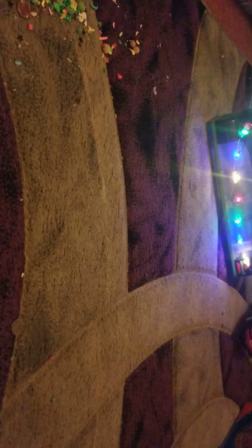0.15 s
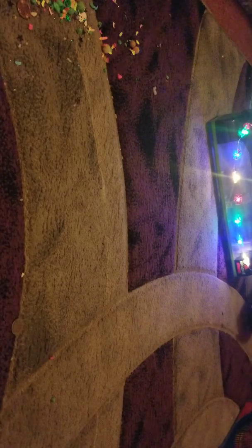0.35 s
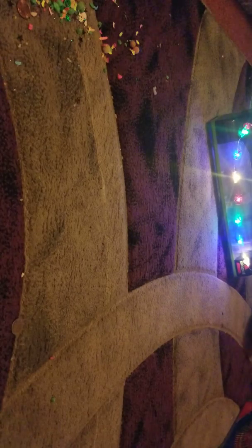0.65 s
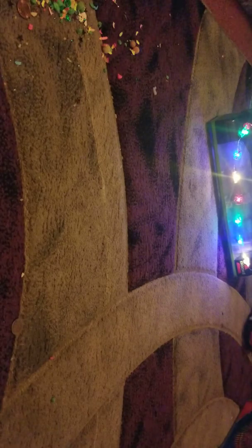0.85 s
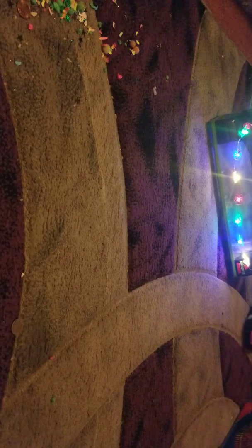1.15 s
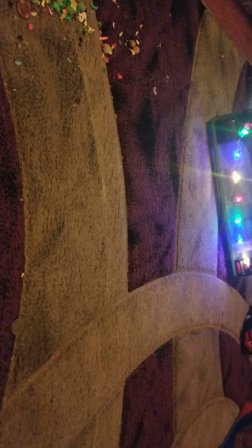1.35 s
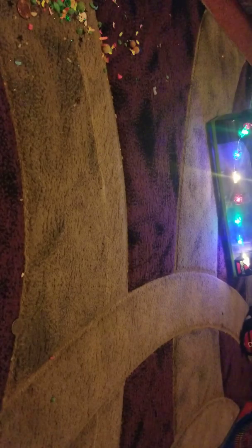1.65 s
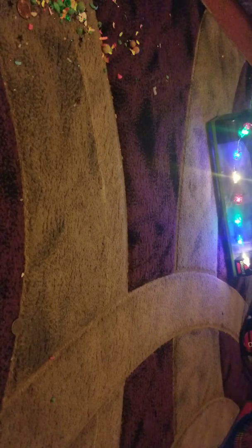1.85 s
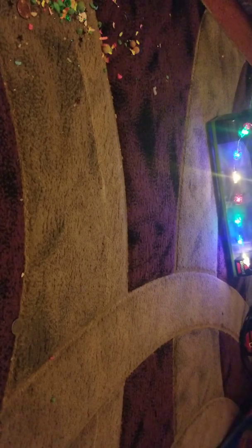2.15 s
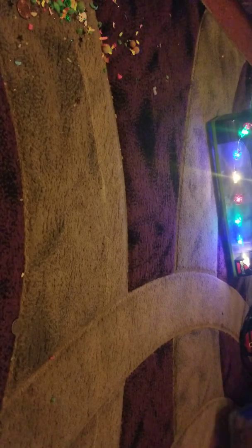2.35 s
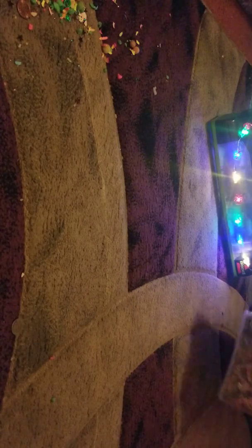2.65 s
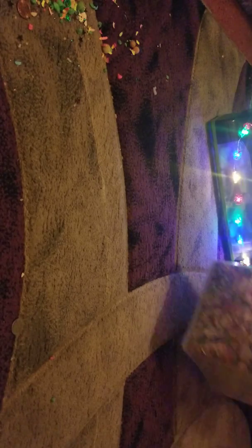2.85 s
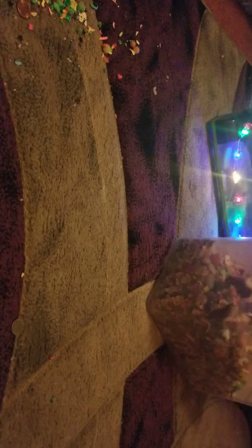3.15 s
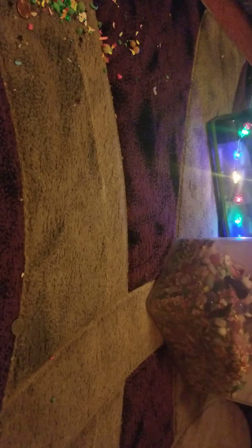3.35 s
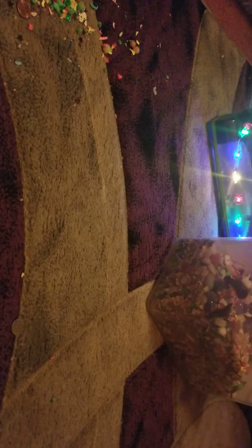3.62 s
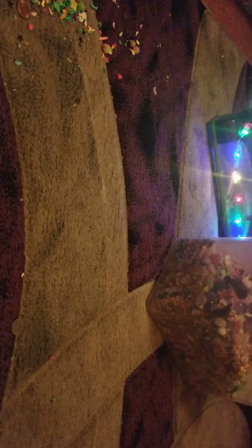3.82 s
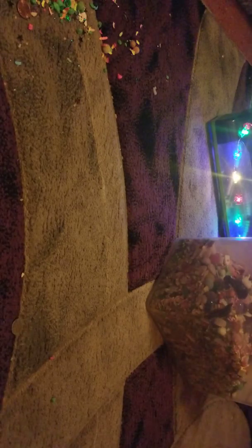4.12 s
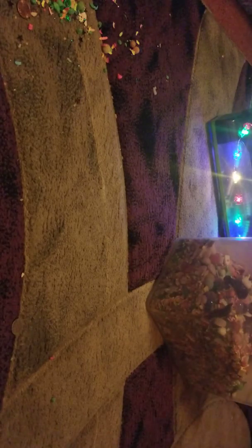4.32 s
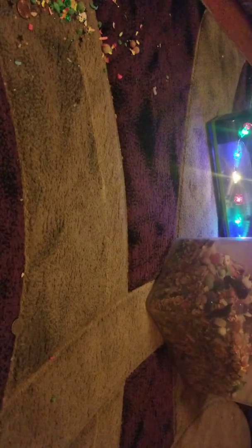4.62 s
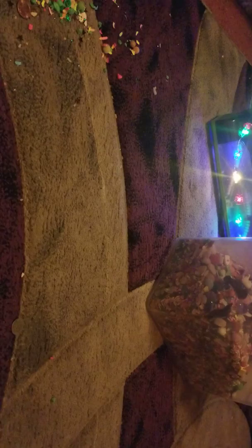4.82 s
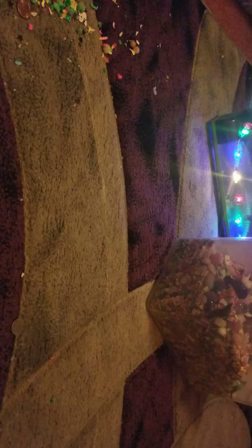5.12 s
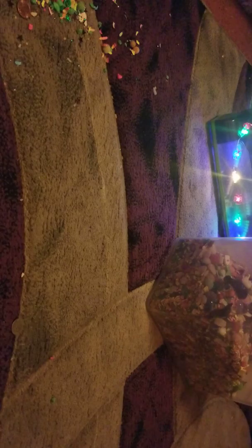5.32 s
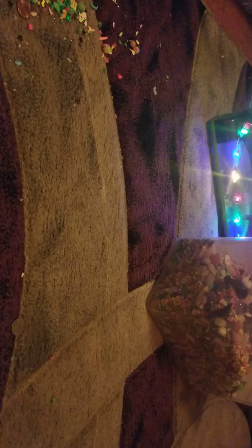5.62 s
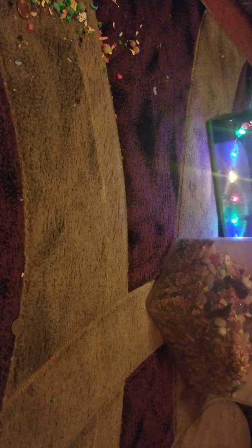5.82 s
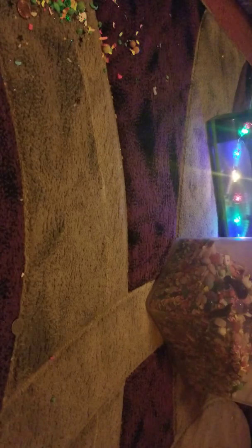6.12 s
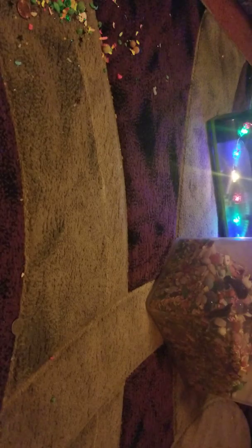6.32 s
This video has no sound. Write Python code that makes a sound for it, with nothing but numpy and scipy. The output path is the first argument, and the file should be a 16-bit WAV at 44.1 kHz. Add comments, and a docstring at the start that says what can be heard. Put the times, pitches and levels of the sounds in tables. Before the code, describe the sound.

Close up in a small carpeted room, a small vacuum cleaner has just been switched off. Its airy roar, whistle and thin motor whine glide steadily downward and fade over about three seconds. Soft bumps and small plastic clicks follow over low room rumble. A sharp click with a debris ping comes late, then a sudden cluster of loud, hard snaps and crackling crumbs at the very end.

```python
"""In a carpeted room, a small vacuum cleaner, just switched off, coasts to a stop.
Air rush (noise-driven duct modes), fan whistle and commutator whine (rotor orders) sink with rotor speed.
Its plastic dust cup is handled: filtered noise bursts bump, click and at last snap.
Hard debris pings as damped sines, crumbs crackle as random grains, and shaped noise rumbles throughout."""
import sys
import numpy as np
from scipy import signal
from scipy.fft import rfft, irfft, next_fast_len
from scipy.io import wavfile
from scipy.ndimage import map_coordinates

SR = 44100
rng = np.random.default_rng(int(sys.argv[2]) if len(sys.argv) > 2 else 0)


def generate_wav(signal):
    """Clip the signal to [-1, 1] and save it as 16-bit WAV at the path in sys.argv[1]."""
    frames = np.transpose(np.atleast_2d(signal))
    scaled = np.clip(frames, -1, 1) * 32767
    pcm = np.round(scaled).astype(np.int16)
    wavfile.write(sys.argv[1], SR, pcm)


N = 285327
TIME = np.arange(N) / SR


def from_db(db):
    """Logarithmic level: decibels to amplitude gain."""
    return 10 ** (np.asarray(db) / 20)


def rms_one(x):
    """Power normalization: scale to rms 1."""
    return x / np.sqrt(np.mean(x ** 2) + 1e-20)


def at_hz(points, hz):
    """Spectral interpolation: read levels on a log-frequency axis."""
    f, db = np.transpose(points)
    return np.interp(np.log(np.maximum(hz, 1)), np.log(f), db)


def drift(rate):
    """Random modulation: smooth chance of rms 1, from rate knots per second."""
    knots = rng.standard_normal(4000)
    # computed at every 20th sample and held
    smooth = map_coordinates(knots, [TIME[::20] * rate], order=2, mode="wrap")
    return rms_one(smooth)[np.arange(N) // 20]


def noise(colour):
    """Spectral shaping: random noise of a given spectrum, rms 1."""
    size = next_fast_len(N)
    hz = np.arange(size // 2 + 1) * SR / size
    spectrum = rfft(rng.standard_normal(size)) * from_db(at_hz(colour, hz))
    return rms_one(irfft(spectrum, size)[:N])


def resonate(x, hz, width):
    """Damped resonance: a two-pole filter with gain 1 at its peak."""
    r = np.exp(-np.pi * width / SR)
    zeros = np.array([1, 0, -1]) * (1 - r * r) / 2
    poles = [1, -2 * r * np.cos(2 * np.pi * hz / SR), r * r]
    return signal.lfilter(zeros, poles, x + 1e-18)


def band(x, low, high):
    """Band limitation: causal band-pass between two frequencies."""
    return signal.sosfilt(signal.butter(2, [low, high], "band", fs=SR, output="sos"), x)


def rise(start_s, rise_s):
    """Linear onset: a ramp from silence to full strength."""
    return np.clip((TIME - start_s) / rise_s, 0, 1)


def add(out, s, sound):
    """Superposition: mix a sound in at its time."""
    start = round(s * SR)
    out[start:start + len(sound)] += sound[:N - start]


ROOM_T60_S = .24


def room(x, wet_db, dull_hz, gap_s):
    """Reverberation: diffuse reflections build up after a short gap and decay exponentially."""
    t = TIME[:SR // 2]
    decay = from_db(-60 * t / ROOM_T60_S)
    build_up = np.clip(t / gap_s - .5, 0, 1)
    tail = rng.standard_normal(len(t)) * decay * build_up
    dulling = signal.butter(1, min(dull_hz, SR / 2 - 1), fs=SR, output="sos")
    tail = signal.sosfilt(dulling, tail / np.linalg.norm(tail))
    return x + from_db(wet_db) * signal.fftconvolve(x, tail)[:N]


# rotor coasting down: (time [s], speed [turns/s])
ROTOR_COAST = [(0, 273.4), (.4, 223.9), (.8, 181.8), (1.2, 145.9), (1.6, 114.9), (2.0, 87.8), (2.4, 63.4),
               (2.8, 40.9), (3.2, 19.3)]


def rotor_speed():
    """Dissipation: air drag and bearing friction slow the rotor smoothly, here along a quartic."""
    s, turns = np.transpose(ROTOR_COAST)
    curve = np.polyval(np.polyfit(s, turns, 4), TIME)
    return np.minimum.accumulate(np.maximum(curve, 0))


# duct resonances: (frequency [Hz], width [Hz], relative level [dB])
DUCT_MODES = [(665.5, 51.5, 3), (540.7, 78, -4), (450.8, 36, -12), (721, 62, -6), (334, 26, -23),
              (235, 63, -31), (984, 96, -13)]
# turbulence colour: (frequency [Hz], relative density [dB per Hz])
TURBULENCE_COLOUR = [(100, -13.5), (250, 20), (450, -1), (900, 9), (1200, -1.5), (1800, 1.5), (2600, -1),
                     (3500, -8), (5000, -17), (6500, -23.5), (8000, -31), (11000, -39.5), (16000, -42.5)]
# sound of air through the fan follows a power of rotor speed: level [dB], exponent
ROAR_DB, ROAR_POWER = -19, 2.527  # level before saturation
HISS_DB, HISS_POWER = -38.5, 2.55  # level at full speed in 1.1 to 5 kHz
ROAR_KNEE = 0.88  # share of full speed above which the roar levels off


def air(speed, low_shift_db=30.5, stop_turns=19.0, flutter_db=0.72):
    """Flow excitation: turbulence rings duct modes; the lower ones take over as the fan slows."""
    flow = speed / speed[0]
    roar, power = 0, 0
    for hz, width, db in DUCT_MODES:
        octaves = np.log2(hz / DUCT_MODES[0][0])
        gain = from_db(db - low_shift_db * (1 - flow) * octaves)
        mode = resonate(rng.standard_normal(N), hz, width)
        roar = roar + gain * rms_one(band(mode, 280, 840))
        power = power + gain * gain
    roar = roar / np.sqrt(power)
    roar_level = from_db(ROAR_DB + flutter_db * drift(20)) * np.tanh((flow / ROAR_KNEE) ** ROAR_POWER)

    hiss = noise(TURBULENCE_COLOUR)
    hiss = hiss / np.std(band(hiss, 1100, 5000))
    # the bearings rub once a turn
    rub = 1 + 0.3 * np.sin(2 * np.pi * np.cumsum(speed) / SR)
    hiss_level = from_db(HISS_DB) * flow ** HISS_POWER

    running = np.minimum(speed / stop_turns, 1) ** 2
    return running * (roar_level * roar + hiss_level * hiss * rub)


# narrow ring of the brush holders: (frequency [Hz], relative level [dB])
BRUSH_HOLDERS = [(3000, -110), (4000, -86), (4400, -73), (5000, -73), (5800, -70), (6200, -85),
                 (7500, -115)]
COMMUTATOR_BARS = 24
# level before bar modulation [dB], speed below which it fades [turns/s]
SCRATCH_DB, SCRATCH_FADE_TURNS = -75, 138


def brush_scratch(speed):
    """Friction excitation: brushes catch on each commutator bar and hiss through their holders."""
    catch = 1 + .7 * np.sin(COMMUTATOR_BARS * 2 * np.pi * np.cumsum(speed) / SR)
    fade = np.minimum(speed / SCRATCH_FADE_TURNS, 1)
    return from_db(SCRATCH_DB) * fade * noise(BRUSH_HOLDERS) * catch


BLADES = 9
# fan whistle through the housing: (frequency [Hz], relative level [dB])
HOUSING_WHISTLE = [(300, -76), (600, -53.5), (1000, -65.5), (1300, -65), (1480, -49), (1750, -39),
                   (1810, -39), (1860, -32.5), (1930, -40.5), (2100, -47.5), (2300, -55), (2410, -34.5)]
# whine of commutator and blade overtones:
# (multiple of rotor speed [1], drive into shell [dB], drive into brush holders [dB])
WHINE_ORDERS = [(18, 3, -20), (24, 0, 1), (36, -13, -4), (48, -9, -2), (72, -28, -4), (96, -25, -6),
                (120, -35, -14), (144, -40, -12), (168, -40, -11)]
# how the motor shell radiates the whine: (frequency [Hz], relative level [dB])
SHELL_RADIATION = [(1200, -88), (1850, -79), (2100, -67), (2600, -69), (3300, -67), (4200, -71),
                   (5000, -75), (6000, -72), (6500, -71), (7000, -88), (8800, -84), (11000, -105)]


def motor_tones(speed, whistle_db=-0.5, whine_db=-1.5, speed_lift_db=3.5, imbalance_db=-47.5):
    """Order tones: imbalance, blade whistle and commutator whine are locked to the rotor angle."""
    # the rotor rattles in its bearings, which frays the high lines
    angle = 2 * np.pi * np.cumsum(speed * (1 + .003 * drift(350))) / SR
    flow = speed / speed[0]
    tones = from_db(imbalance_db) * np.sqrt(flow) * np.sin(angle)
    whistle_level = from_db(whistle_db + at_hz(HOUSING_WHISTLE, BLADES * speed))
    tones += whistle_level * np.sin(BLADES * angle)
    # the faster the rotor, the harder the whine is driven
    drive_db = whine_db + speed_lift_db * flow
    for multiple, shell_db, brush_db in WHINE_ORDERS:
        hz = multiple * speed
        shell = from_db(shell_db + at_hz(SHELL_RADIATION, hz))
        holders = from_db(brush_db + at_hz(BRUSH_HOLDERS, hz))
        drive = from_db(drive_db + 1.8 * drift(45))
        tones += (shell + holders) * drive * np.sin(multiple * angle)
    # the tones die out in the last slow turns; sqrt(2) turns rms into peak
    return np.sqrt(2) * tones * np.minimum(speed / 48, 1) ** 2.5


# room rumble without its hums: (time [s], level [dB])
RUMBLE_LEVEL = [(0, -41), (1.7, -45.5), (2.2, -42), (4.7, -37), (6.47, -37)]
# its colour: (frequency [Hz], relative density [dB per Hz])
RUMBLE_SPECTRUM = [(20, -10.5), (35, -21), (52, 6), (75, -1), (115, -3), (155, -3.5), (200, -13.5),
                   (300, -21.5), (450, -27.5), (700, -40), (1200, -50.5), (3000, -62.5)]
# narrow hums in the room: (frequency [Hz], width [Hz], level from the rumble [dB])
ROOM_HUMS = [(89.76, 4.5, -2), (777, 3.9, -37)]
# microphone hiss: (frequency [Hz], relative density [dB per Hz])
HISS_FLOOR = [(500, 4.5), (1500, -1), (3000, 6.5), (6000, -1.5), (9000, -11.5), (15500, -7.5)]
FLOOR_DB = -83


def background():
    """Shaped noise and narrow-band beating: rumble of slowly changing level with unsteady hums, over faint hiss."""
    s, db = np.transpose(RUMBLE_LEVEL)
    level = from_db(np.interp(TIME, s, db))
    rumble = noise(RUMBLE_SPECTRUM)
    for hz, width, hum_db in ROOM_HUMS:
        hum = resonate(rng.standard_normal(N), hz, width)
        rumble = rumble + from_db(hum_db) * rms_one(resonate(hum, hz, 2 * width))
    return level * rumble + from_db(FLOOR_DB) * noise(HISS_FLOOR)


def strokes(rows, colour, grain_db):
    """Amplitude modulation: uneven noise swells and fades with each movement."""
    swell = 0
    for s, length, db in rows:
        swell = swell + from_db(db) * np.sin(np.pi * np.clip((TIME - s) / length, 0, 1))
    return swell * rms_one(noise(colour) * from_db(grain_db * drift(300)))


# the body slides against hand and carpet: (start [s], length [s], level at mid-stroke [dB])
BODY_SLIDES = [(.88, 0.093, -54.5), (1.16, 0.079, -52), (1.43, 0.054, -62), (3.06, 0.06, -52.5),
               (3.11, 0.11, -54), (4.70, 0.026, -44), (5.91, 0.1, -50)]
# colour of that rubbing: (frequency [Hz], relative density [dB per Hz])
RUBBING_COLOUR = [(100, -8), (350, -7.5), (900, -9.5), (1600, 8), (2500, -3), (4500, -8), (7000, -25),
                  (15000, -32)]


def slides():
    """Sliding friction: the body rubs against hand and carpet as shaped noise."""
    return strokes(BODY_SLIDES, RUBBING_COLOUR, grain_db=-1.0)


# resonances of the dust cup: (frequency [Hz], width [Hz], boost [dB])
CUP_MODES = [(619, 143, 6.5), (956, 11, 1.5), (1093, 75, -3.5), (1336, 29, 4.5), (1670, 320, 2.5),
             (2200, 1400, 3.5), (2660, 23, 4.5), (3100, 110, 5), (3620, 1600, 8.5), (4540, 63, 2),
             (4840, 60, -5.5), (6110, 360, 4.5), (8500, 330, 3)]


def cup_ring(x):
    """Modal resonance: the plastic cup boosts some of its modes and weakens others."""
    return x + sum((from_db(db) - 1) * resonate(x, hz, width) for hz, width, db in CUP_MODES)


TILT_PIVOT_HZ = 1700


def tilted(colour_db, bands, tilt):
    """Contact stiffness: a harder contact lifts the upper bands and thins the lower ones."""
    centres = np.sqrt(np.prod(bands, axis=1))
    return np.array(colour_db) + tilt * np.log2(centres / TILT_PIVOT_HZ)


def contact(peak_db, colour_db, bands, t60, rise_s, wall_hz=(), wall_db=(6.0, 3.0), wall_q=2.1,
            crack_db=5.0):
    """Impact excitation: a crack and brief chatter drive the cup; the spot favours some wall modes."""
    t = TIME[:SR // 7]
    chatter = from_db(-60 * t / max(t60, .002))
    crack = from_db(crack_db) * np.exp(-t / 0.00096)
    force = (chatter + crack) * (1 - np.exp(-t / rise_s))
    rings = cup_ring(rng.standard_normal((len(bands), len(t))) * force)
    for hz, db in zip(wall_hz, wall_db):
        rings = rings + (from_db(db) - 1) * resonate(rings, hz, hz / wall_q)
    out = 0
    for ring, (low, high), db in zip(rings, bands, colour_db):
        part = band(band(ring, low / 1.15, high * 1.1), low / 1.3, high * 1.25)
        # the level refers to the first sixtieth of a second
        out = out + from_db(peak_db + db) * part / np.std(part[:SR // 60])
    return out


# plastic clicks and snaps: (time [s], strength [dB], hardness as tilt [dB per octave],
# chatter t60 [s], favoured wall mode [Hz])
CUP_CLICKS = [(1.174, -27.5, 2.5, 0.063, 520), (1.202, -25.5, -4.5, 0.038, 590), (1.448, -31, -7, .05, 676),
              (1.934, -39, 2.5, 0.056, 520), (2.059, -19.5, 2, 0.088, 756), (2.22, -31, -3.5, 0.031, 690),
              (3.173, -31, 2.5, 0.014, 900), (3.312, -49, -5, 0.038, 630),
              (4.274, -28.5, -4.5, 0.075, 1010), (4.425, -53.5, -9, 0.036, 590),
              (4.704, -25.5, -3, 0.065, 585), (4.744, -28, -4.5, 0.0096, 580),
              (5.01, -32.5, -5, 0.055, 593), (5.057, -35, 2, 0.024, 630), (5.15, -50.5, -6.5, 0.066, 875),
              (5.297, -33.5, -5, 0.03, 650), (5.324, -8, 2.5, 0.047, 1110), (5.418, -31.5, 3.5, 0.045, 590),
              (5.457, -30.5, 0, .02, 695), (5.563, -34.5, 2, .02, 560), (5.592, -27.5, -3.5, 0.02, 720),
              (5.702, -26.5, -3, 0.014, 574), (5.912, -33.5, -6.5, 0.01, 570),
              (5.952, -11, -0.5, 0.027, 970), (6.043, -31.5, 5, 0.029, 1000), (6.071, -32, 6.5, 0.072, 520),
              (6.113, -23, 3.5, 0.062, 620), (6.14, -23.5, 5, .04, 620), (6.182, -3, 3.5, 0.026, 670),
              (6.191, -12, 6, 0.078, 856), (6.243, 2, 4, .035, 1060), (6.259, -8.5, 5.5, 0.019, 960),
              (6.292, -6, -0.5, 0.027, 670), (6.352, -4, 4.5, 0.078, 690), (6.366, -13.5, -1, 0.14, 610),
              (6.409, -13.5, -0.5, 0.052, 650), (6.421, -12, 7.5, 0.022, 640),
              (6.437, -7.5, 7.5, 0.06, 553), (6.453, -12.5, 7.5, 0.033, 1380)]
# low, middle, high and top band: (lower edge [Hz], upper edge [Hz])
CLICK_RANGES = [(380, 1150), (1250, 2400), (2600, 5000), (6200, 14500)]
# a click without tilt, one value per band: level from its strength [dB]
CLICK_BALANCE = [-15.5, -24.5, -27, -47.5]
# soft bumps of the body: (time [s], strength [dB], hardness as tilt [dB per octave], t60 [s])
BODY_BUMPS = [(1.453, -35, -2.5, 0.035), (3.068, -35, 1, 0.057), (3.099, -35.5, 2.5, 0.097),
              (3.391, -55.5, -1.5, 0.02), (4.703, -31, 0.5, 0.031), (4.744, -44, -2.5, 0.033),
              (5.324, -30, 2.5, 0.079), (5.844, -35.5, -0.5, 0.076), (5.953, -26.5, 4.5, .11)]
# bass, low and middle band: (lower edge [Hz], upper edge [Hz])
BUMP_RANGES = [(150, 400), (400, 1000), (1100, 3500)]
# a bump without tilt, one value per band: level from its strength [dB]
BUMP_BALANCE = [0, -8, -35.5]
# the high wall mode [Hz] moves with the spot touched [octaves, standard deviation]
HIGH_WALL_HZ, WALL_SPREAD_OCTAVES = 3100, .18


def handling(click_rise_s=0.0023, bump_rise_s=0.032):
    """Impact duration: fast-rising contacts click hard, slow-rising ones bump softly."""
    out = np.zeros(N)
    high_modes = HIGH_WALL_HZ * 2 ** (WALL_SPREAD_OCTAVES * rng.standard_normal(len(CUP_CLICKS)))
    for (s, db, tilt, t60, low_hz), high_hz in zip(CUP_CLICKS, high_modes):
        colour = tilted(CLICK_BALANCE, CLICK_RANGES, tilt)
        add(out, s, contact(db, colour, CLICK_RANGES, t60, click_rise_s, (low_hz, high_hz)))
    for s, db, tilt, t60 in BODY_BUMPS:
        colour = tilted(BUMP_BALANCE, BUMP_RANGES, tilt)
        add(out, s, contact(db, colour, BUMP_RANGES, t60, bump_rise_s))
    return out


# the floor thuds as the body shifts: (start [s], length [s], level at mid-stroke [dB])
FLOOR_THUDS = [(3.05, 0.11, -31), (4.63, 0.12, -30.5)]
# their colour: (frequency [Hz], relative density [dB per Hz])
THUD_SPECTRUM = [(15, 4), (35, -30), (60, 10), (130, -20.5), (300, -30), (800, -32), (3000, -84)]


def thuds():
    """Structure-borne sound: the shifting body excites the floor as low shaped noise."""
    return strokes(FLOOR_THUDS, THUD_SPECTRUM, grain_db=1.0)


# hard bits of debris that ping on the cup wall:
# (time [s], pitch [Hz], peak level [dB], t60 [s])
DEBRIS_PINGS = [(5.297, 3960, -50, 0.013), (5.327, 3280, -12.5, 0.0087), (5.329, 4520, -38, 0.089),
                (5.498, 3920, -35.5, 0.0086), (5.593, 3700, -37.5, 0.014), (6.111, 3630, -27, 0.014),
                (6.292, 8300, -25.5, 0.11), (6.292, 10060, -27, 0.099)]


def pings():
    """Free vibration: each bit sets one stiff wall mode ringing as a damped sine."""
    out, t = np.zeros(N), TIME[:SR // 4]
    for s, hz, db, t60 in DEBRIS_PINGS:
        add(out, s, from_db(db - 60 * t / t60) * np.sin(2 * np.pi * hz * t))
    return out


# crumb colour: (frequency [Hz], relative level [dB])
CRUMB_SPECTRUM = [(700, -10), (1500, 11), (3300, -11), (6000, 9), (10000, 0), (15000, -3)]
# crumbs stir as the cup is tipped, then slide in earnest: start [s], rise [s], level [dB]
STIR_S, STIR_RISE_S, STIR_DB = 5.93, 0.09, -58.5
SLIP_S, SLIP_RISE_S, SLIP_DB = 6.165, 0.011, -40
# each click after the slip shakes more loose: level from its strength [dB], settling time [s]
SHAKEN_DB, SETTLE_S = -31, 0.023


def crumbs(per_s=540.0, cycles=5.3):
    """Random impacts: clumped grains of many sizes strike all modes with strengths of their own."""
    level = from_db(STIR_DB) * rise(STIR_S, STIR_RISE_S) + from_db(SLIP_DB) * rise(SLIP_S, SLIP_RISE_S)
    for s, db, *_ in CUP_CLICKS:
        if s > SLIP_S:
            settling = (TIME > s) * np.exp(-np.abs(TIME - s) / SETTLE_S)
            level = level + from_db(db + SHAKEN_DB) * settling
    sizes = from_db(3.5 * np.minimum(rng.exponential(1, N), 3.5))
    # the drifting rate gathers the ticks in clumps
    ticks = sizes * (rng.random(N) < per_s * from_db(4 * drift(70)) / SR)
    grains = 0
    for hz in np.geomspace(700, 15000, 19):
        mode = resonate(ticks * rng.standard_normal(N), hz, hz / cycles)
        grains = grains + from_db(at_hz(CRUMB_SPECTRUM, hz)) * rms_one(mode)
    return level * rms_one(cup_ring(grains))


def scene():
    """Superposition: motor, dust cup, floor and room sound together."""
    speed = rotor_speed()
    tones = room(motor_tones(speed), wet_db=-2.0, dull_hz=12000, gap_s=.004)
    motor = air(speed) + brush_scratch(speed) + tones
    floor = background() + thuds()
    cup = slides() + handling() + pings() + crumbs()
    return (motor + room(cup, wet_db=-4.5, dull_hz=11000, gap_s=0.0079) + floor)[None]


CUTOFF_HZ = 15900


def record(dry):
    """Low-pass filtering: an elliptic filter cuts the top steeply."""
    return signal.sosfilt(signal.ellip(10, .1, 80, CUTOFF_HZ, fs=SR, output="sos"), dry)


dry = scene()
out = record(dry)
generate_wav(out)
```